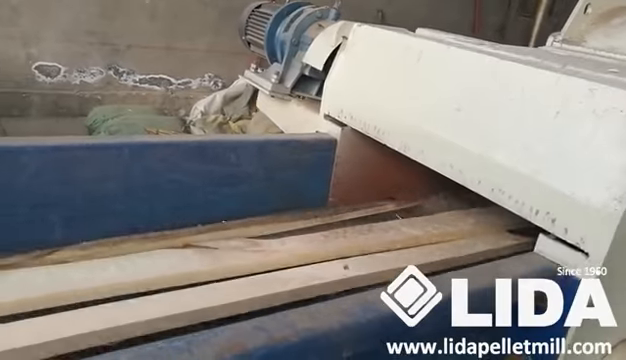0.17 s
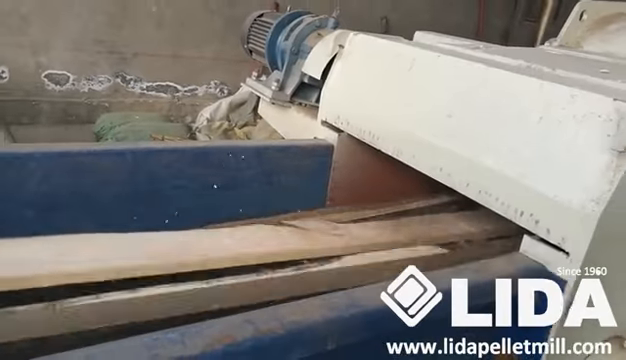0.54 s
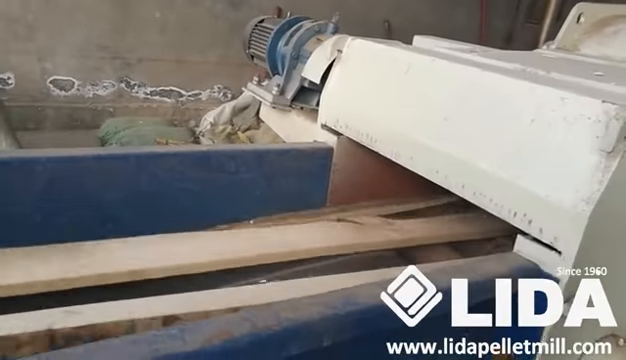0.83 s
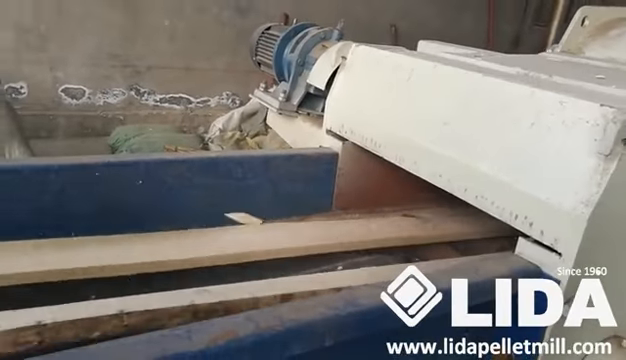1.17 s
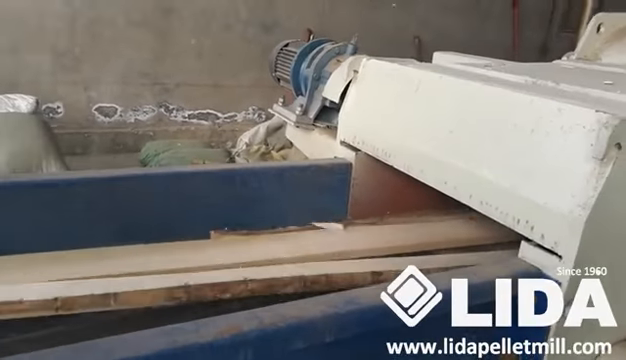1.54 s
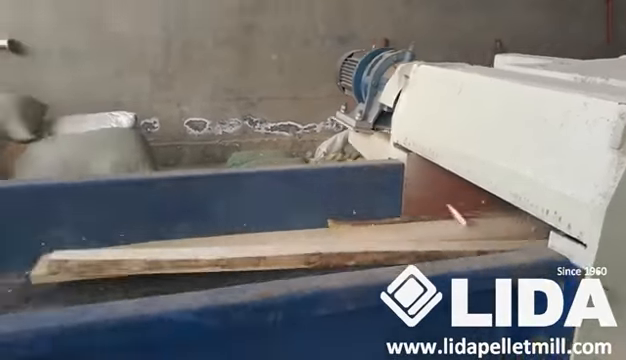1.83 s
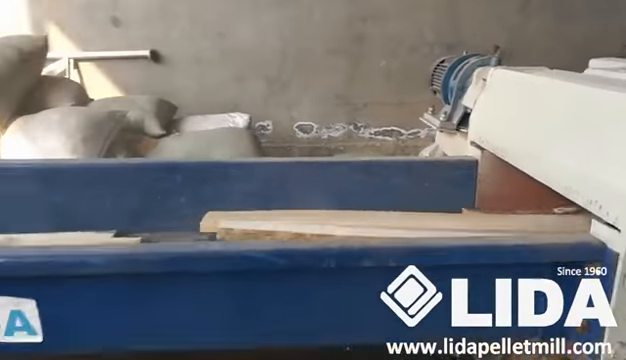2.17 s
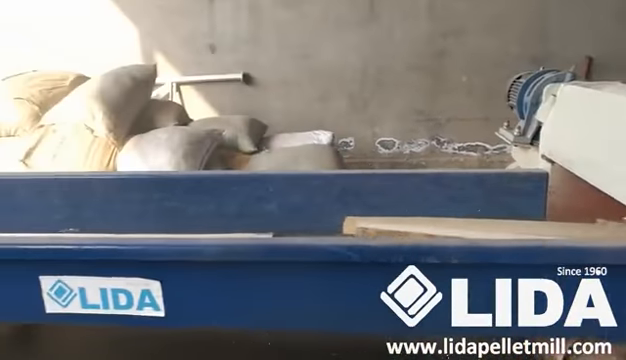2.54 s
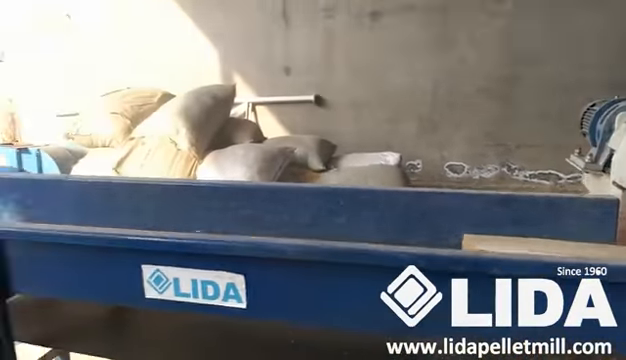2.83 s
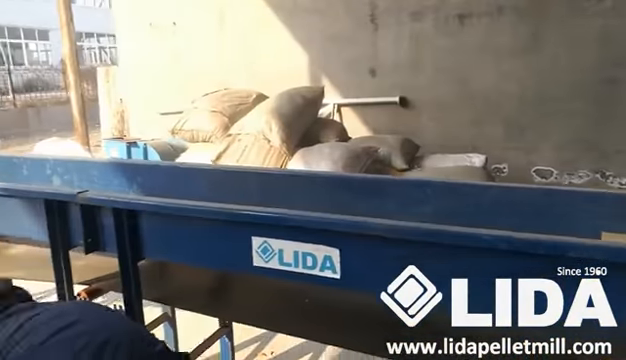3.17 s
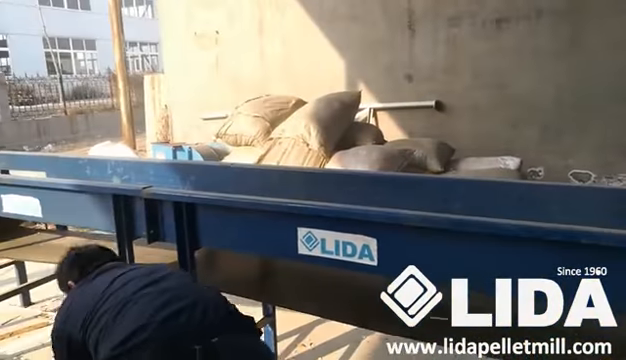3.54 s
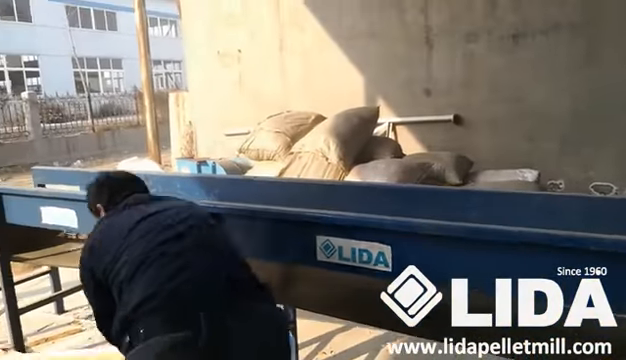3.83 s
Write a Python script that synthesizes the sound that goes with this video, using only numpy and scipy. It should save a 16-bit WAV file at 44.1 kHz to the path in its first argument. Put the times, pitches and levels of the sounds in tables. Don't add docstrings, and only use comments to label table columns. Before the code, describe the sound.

Wood chipper knives hammer planks in a harsh buzzing roar, with boards knocking and chips rattling.

```python
import sys
import numpy as np
from scipy import signal
from scipy.fft import rfft, irfft, next_fast_len
from scipy.io import wavfile
from scipy.ndimage import uniform_filter1d, minimum_filter1d, map_coordinates

SR = 44100
rng = np.random.default_rng(int(sys.argv[2]) if len(sys.argv) > 2 else 0)


def nominal_scale(level):
    x = np.asarray(level, float) / 20
    return 10 ** x


def dump(signal):
    limited = np.clip(np.atleast_2d(signal).T, -1, 1)
    pcm = np.round(limited * 32767).astype(np.int16)
    wavfile.write(sys.argv[1], SR, pcm)


N = 176400
TIME_S = np.arange(N) / SR
KNIFE_HZ = 37.6


def unit(x):
    return x / np.sqrt(np.mean(x ** 2) + 1e-20)


def along(points, hz):
    point_hz, value = np.transpose(points)
    return np.interp(np.log(hz + 1), np.log(point_hz + 1), value)


def curves(rows, at_s=TIME_S):
    s, *columns = np.transpose(rows)
    return [np.interp(at_s, s, column) for column in columns]


def wobble(rate_hz):
    knots = rng.standard_normal(int(N * rate_hz / SR) + 4)
    return map_coordinates(knots, [np.arange(N) * rate_hz / SR])


def fade_in(from_s, span_s):
    return 1 / (1 + np.exp((from_s - TIME_S) / span_s))


def filtered(x, response):
    m = next_fast_len(N + SR // 2)
    return irfft(rfft(x, m) * response(np.fft.rfftfreq(m, 1 / SR)), m)[..., :N]


def smoothed(x, sizes, axes):
    first = uniform_filter1d(x, sizes[0], axes[0])
    return uniform_filter1d(first, sizes[1], axes[1])


def rush(spectrum, patchy_db):
    z = signal.stft(rng.standard_normal((2, N)), nperseg=512)[2]
    patches = unit(smoothed(rng.standard_normal(z.shape[1:]), (4, 7), (0, 1)))
    pair = signal.istft(z * nominal_scale(patchy_db * patches), nperseg=512)[1][:, :N]
    return unit(filtered(pair, lambda hz: nominal_scale(along(spectrum, hz))))


def grains(s, hz, db, t60_s, size):
    t = np.arange(size) / SR
    at = (np.round(s * SR).astype(int)[:, None] + np.arange(size)).ravel()
    fade = nominal_scale(db[:, None] - 60 * t / t60_s[:, None]) * (1 - np.exp(-t / 0.0002))
    phase = 2 * np.pi * rng.random((len(s), 2))
    streams = []
    for c in (0, 1):
        sines = fade * np.sin(2 * np.pi * hz[:, None] * t + phase[:, [c]])
        streams.append(np.bincount(at, sines.ravel(), N + SR)[:N])
    return np.array(streams)


# start_s, ring_db, ring_hz, spray_db
BITE = [(0, -25.5, 993, -40.5), (.3, -42, 1000, -47), (.68, -42, 1040, -41.5), (.74, -25.5, 1052, -37),
        (.84, -22, 1180, -22.5), (.86, -12.5, 1340, -15), (.91, -14, 1590, -18), (.97, -19, 1840, -17.5),
        (1.02, -45, 1580, -24), (1.16, -30.5, 1410, -21), (1.18, -16.5, 1293, -18.5),
        (1.4, -16.5, 1483, -14.5), (1.47, -21, 1470, -15), (1.5, -14.5, 1537, -11.5), (2.0, -12, 1500, -14),
        (2.15, -24.5, 1500, -14), (2.45, -9, 1377, -15), (2.63, -16, 1440, -18), (2.72, -26, 1564, -17.5),
        (4, -27, 1476, -24)]
# start_s, level_db
STRIKE_ACCENTS = [(.829, -2), (.856, 4), (.882, -0.5), (.909, 3.5), (.935, 1.5), (.962, -2.5), (1.042, 3.5),
                  (1.07, 7), (1.12, 7.5), (1.148, 0.5), (1.175, 2.5), (1.2, 2), (1.228, -0.5), (1.255, -1),
                  (1.281, 4.5), (1.308, 4), (1.335, -0.5), (1.361, 0), (1.388, 3), (1.414, -2),
                  (1.441, 0.5), (1.467, -14.5), (1.494, -1.5), (1.52, -5), (1.547, -1), (1.574, -3.5),
                  (1.68, 0), (1.76, -2.5), (1.84, -0.5), (1.866, -1), (1.946, -1), (2.026, -5),
                  (2.052, 1.5), (2.106, 2.5), (2.132, -1), (2.185, -3.5), (2.265, 2.5), (2.345, -2.5),
                  (2.398, -2.5), (2.478, -1.5), (2.505, -1.5), (2.584, 1), (2.77, -1.5), (2.8, 2),
                  (2.903, -7), (3.116, -6.5), (3.17, 3.5), (3.223, -6), (3.36, 1), (3.382, 0), (3.489, 2.5),
                  (3.648, -1), (3.68, 2.5), (3.701, 3), (3.728, 2), (3.755, 6), (3.781, 2), (3.834, 5.5),
                  (3.861, 2), (3.941, 9)]
# centre_hz, width_hz, level_db
HOOD_PLATES = [(1282, 13, -4.5), (1380, 68, -2), (1500, 35, 5.5), (1680, 48, 2.5), (1840, 190, 0.5)]
# freq_hz, level_db_per_hz
SPLINTERS = [(300, -32.5), (520, -7), (680, -9), (1000, -5), (1900, 1.5), (3500, -2), (5000, -8),
             (7300, -13), (7750, -21.5), (9000, -120)]


def knives():
    first_s, scatter_db, odd_knife_db = 0.003, 0.9, 0.23
    tear_floor, rise_s, die_s = 0.38, 0.0013, 0.0105
    pitch_spread, ring_cycles = 0.17, 4.04
    overtone, overtone_db = 2.0, -5.5

    k = np.arange(int(N / SR * KNIFE_HZ))
    draw = rng.standard_normal((len(k), 3))
    s = first_s + k / KNIFE_HZ + 0.001031 * np.abs(draw[:, 0])
    size_db = scatter_db * draw[:, 1] + odd_knife_db * (-1) ** k
    accent_s, accent_db = np.transpose(STRIKE_ACCENTS)
    size_db[np.round((accent_s - first_s) * KNIFE_HZ).astype(int)] = accent_db

    hits = np.bincount(np.round(s * SR).astype(int), nominal_scale(size_db), N)[:N]
    t = np.arange(SR // 8) / SR
    tear = np.exp(-t / die_s) * (1 - np.exp(-t / rise_s))
    beat = unit(tear_floor + signal.fftconvolve(hits, tear)[:N])
    ring_db, _, spray_db = curves(BITE)

    each = rng.standard_normal((len(k), 24, 3))
    at_s = (s[:, None] + 0.0065 * each[..., 0] ** 2).ravel()
    detune = (0.2 * draw[:, 2:] + each[..., 1]).ravel()
    hz = curves(BITE, at_s)[1] * np.exp(pitch_spread * detune)
    high = np.arange(len(at_s)) % 3 == 0
    hz = hz * np.where(high, overtone, 1)
    grain_db = (size_db[:, None] + 4 * each[..., 2]).ravel() + overtone_db * high
    ring = grains(at_s, hz, grain_db, ring_cycles * 7 * (1 + high) / hz, size=600)

    def plates(f):
        resonances = [nominal_scale(db) * 1j * f * w / (c * c - f * f + 1j * f * w) for c, w, db in HOOD_PLATES]
        return 1 + sum(resonances)

    chips = unit(beat * nominal_scale(0.75 * wobble(150)) * rush(SPLINTERS, patchy_db=2.5))
    return nominal_scale(ring_db) * unit(filtered(ring, plates)) + nominal_scale(spray_db + 3.5) * chips


# start_s, peak_db, ring_hz
KNOCKS = [(0.014, -7, 993), (0.016, -10, 2620), (0.077, -17, 860), (0.142, -12.5, 950), (0.205, -14.5, 754),
          (0.356, -14, 824), (0.365, -13.5, 904), (0.383, -6.5, 1010), (0.469, -14, 997),
          (0.551, -14.5, 1380), (0.624, -15.5, 1780), (0.721, -4.5, 1029), (0.756, -7, 950),
          (0.776, -3.5, 1153), (3.171, -4, 1930), (3.277, -2, 802), (3.356, -8, 1770), (3.47, -7, 845)]


def knocks():
    s, db, hz = np.transpose(KNOCKS)
    db = db - 6
    mode_ratio = np.array([0.62, 1, 1.12, 1.5, 2.1, 2.9])
    mode_db = np.array([-6.5, 0.5, -4.5, -7.0, -6.5, -7.5])
    each = rng.standard_normal((len(s), 6, 3))
    at_s = (s[:, None] + 0.002 * np.abs(each[..., 0])).ravel()
    mode_hz = (hz[:, None] * mode_ratio * np.exp(0.049 * each[..., 1])).ravel()
    level_db = (db[:, None] + mode_db + 1.4 * each[..., 2]).ravel()
    t60_s = 0.045 * (1200 / mode_hz) ** 0.38
    wood = grains(at_s, mode_hz, level_db, t60_s, size=2000)

    hits = np.bincount(np.round(s * SR).astype(int), nominal_scale(db), N)
    decay = np.exp(-np.arange(2000) / (0.0073 * SR))
    crack = 0.36 * signal.fftconvolve(hits, decay)[:N] * rush(SPLINTERS, patchy_db=3.0)
    return wood + crack


# start_s, peak_db
SLAMS = [
    (0.999, -18.5),
    (1.826, -24),
]
# freq_hz, t60_s
TROUGH = [(240, 0.052), (345, 0.4)]


def slams():
    rows = np.array([(s, hz, db, t60_s) for s, db in SLAMS for hz, t60_s in TROUGH])
    return grains(*rows.T, size=8000)[0]


# freq_hz, level_db_per_hz
OUTFEED = [(400, -63), (560, -6.5), (750, -0.5), (1200, -2.5), (2200, -1), (4200, -3.5), (7500, -16),
           (9000, -120)]


def outfeed():
    level_db = -16.5 + 1.4 * wobble(12) + 0.79 * wobble(120)
    return nominal_scale(level_db) * fade_in(2.36, 0.15) * rush(OUTFEED, patchy_db=3.5)


# start_s, rumble_db, hum_db (the hum column drives the drum)
HOOD = [(0.0, -35, -51), (0.31, -44, -90), (0.36, -29, -29), (0.53, -40, -59), (1.05, -21, -43),
        (1.1, -36, -58), (1.18, -27.5, -39), (1.56, -26, -46), (1.64, -20, -30), (1.8, -23.5, -49.5),
        (2.05, -25, -38), (2.15, -23.5, -28.5), (3.1, -27, -29), (3.3, -24.5, -35), (3.42, -27.5, -26),
        (3.7, -26.5, -26.5), (4.0, -22.5, -27)]
# freq_hz, level_db_per_hz
RUMBLE = [(12, -49), (20, -36), (92, -12), (222, -3.5), (286, -6), (341, -4), (447, -13), (676, -8),
          (900, -13), (1170, -40), (1980, -120)]
# freq_hz, level_db_per_hz
IDLE = [(18, -56), (30, -37.5), (113, -1), (292, -5), (999, -3), (1100, 0), (1350, -7.5), (3750, -5.5),
        (7710, -16.5), (10000, -53), (17000, -120)]


def hood():
    rumble_db, _ = curves(HOOD)
    throb = 1 + 0.16 * np.cos(2 * np.pi * KNIFE_HZ * (TIME_S - 0.012))
    rumble = nominal_scale(rumble_db + 0.5 + 0.7 * wobble(9.8)) * throb * rush(RUMBLE, patchy_db=2.0)
    return rumble + nominal_scale(-26) * rush(IDLE, patchy_db=4.5)


# order_of_knife_rate, level_db
HUM_ORDERS = [(3, -14), (5, -10), (6, -1.5), (9, -13)]


def drum():
    hum = np.zeros(N)
    for order, db in HUM_ORDERS:
        level = nominal_scale(db + 1.7 * wobble(9.6))
        hum += level * np.sin(2 * np.pi * order * (KNIFE_HZ - 0.05) * TIME_S + 0.14 * wobble(5.86))
    whine = nominal_scale(-26.5 + 3 * wobble(12)) * np.sin(2 * np.pi * 667 * TIME_S + 1.1 * wobble(25))
    _, hum_db = curves(HOOD)
    return np.sqrt(2) * (nominal_scale(hum_db - 0.5) * hum + whine * fade_in(2.9, 0.15))


# freq_hz, level_db_per_hz
THUD = [(12, -5), (25, -2), (70, 1), (110, 1.5), (200, -46)]


def thud():
    ring_db = curves(BITE)[0]
    return nominal_scale(-35.5 + 0.93 * (ring_db + 16.5)) * rush(THUD, patchy_db=0.5)


# freq_hz, t60_s
YARD = [(200, 0.45), (2000, 0.55), (7000, 0.13)]


def yard(x):
    hz, t, z = signal.stft(rng.standard_normal((2, SR // 2)), SR, nperseg=256)
    decay = nominal_scale(-60 * t / along(YARD, hz)[:, None])
    tail = signal.istft(z * decay, SR, nperseg=256)[1]
    delayed = np.pad(x, ((0, 0), (300, 0)))
    return signal.fftconvolve(delayed, tail / np.linalg.norm(tail[0]), axes=1)[:, :N]


def ports(pair, facing):
    m = next_fast_len(N + 4096)
    bin_hz = np.fft.rfftfreq(m, 1 / SR)
    hz, *columns = np.transpose(facing)
    alike, lead_rad, lean_db = [along(np.transpose([hz, c]), bin_hz) for c in columns]
    turn = np.arccos(np.clip(alike, -1, 1)) / 2
    mid, side = rfft(pair, m) * [np.cos(turn), np.sin(turn)]
    tilt = nominal_scale(lean_db / 2) * np.exp(-0.5j * lead_rad)
    return irfft([(mid + side) * tilt, (mid - side) / tilt], m)[:, :N]


# freq_hz, likeness_0_to_1, right_lead_rad, left_minus_right_db
FACING = [(60, .985, 0, 0), (200, .92, -.05, 0), (350, .45, -.1, .5), (650, .08, .1, -.3),
          (1050, .75, .05, 1), (1400, .8, .05, .7), (1800, .3, .45, 2.5), (2900, .25, .3, -1.2),
          (5000, .05, 0, -.3)]
# freq_hz, likeness_0_to_1, right_lead_rad, left_minus_right_db
TURNED = [(60, .985, 0, 0), (200, .95, .1, 0), (350, .6, .4, -1), (480, .5, 1.9, -3), (620, .55, 2.2, -5),
          (1200, .4, 1.6, -.3), (1700, .2, 2.6, 0), (2400, .5, 3.1, -1.2), (3200, .3, 3.1, -1.5),
          (5200, .05, 3, -3.5)]


def scene():
    near = knives() + knocks()
    pair = near + nominal_scale(-7) * yard(near) + hood() + thud() + outfeed()
    pair[0] += slams() + drum()
    away = fade_in(2.074, 0.11)
    panned = (1 - away) * ports(pair, FACING) + away * ports(pair, TURNED)
    return panned * nominal_scale(2.2 * away * (1.5 - away))


def band_holes(x):
    hole_db, under_db, chance_db = -40, -8.5, 2
    mid_side = np.array([x[0] + x[1], x[0] - x[1]]) / 2
    hz, _, z = signal.stft(mid_side, SR, nperseg=2048, noverlap=1536)
    power = smoothed(np.abs(z) ** 2, (5, 3), (1, 2))
    around = smoothed(power.mean(0), (24, 5), (0, 1))
    luck = nominal_scale(2 * chance_db * unit(smoothed(rng.standard_normal(z.shape), (7, 6), (1, 2))))
    threshold = around * nominal_scale(2 * under_db - 7 * (hz < 650))[:, None]
    strong = (power * luck >= threshold).astype(float)
    strong = minimum_filter1d(minimum_filter1d(strong, 4, 1), 4, 2)
    holed = ((hz > 380) & (hz < 7000))[:, None]
    keep = nominal_scale(hole_db * (1 - strong) * holed) * (hz < 7650)[:, None]
    mid, side = signal.istft(z * keep, SR, nperseg=2048, noverlap=1536)[1][:, :N]
    return np.array([mid + side, mid - side])


def band_limit(x):
    return signal.sosfilt(signal.butter(12, 15900, fs=SR, output="sos"), x)


def record(dry):
    overloaded = np.clip(band_holes(dry), -1.012, 1.012)
    return band_limit(overloaded)


dry = scene()
out = record(dry)
dump(out)
```